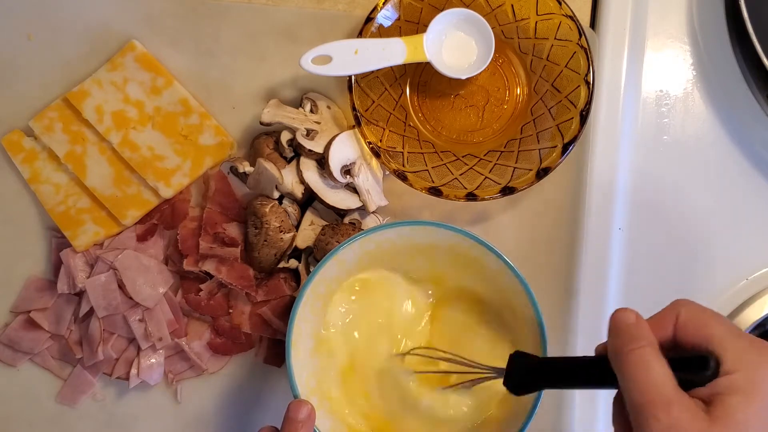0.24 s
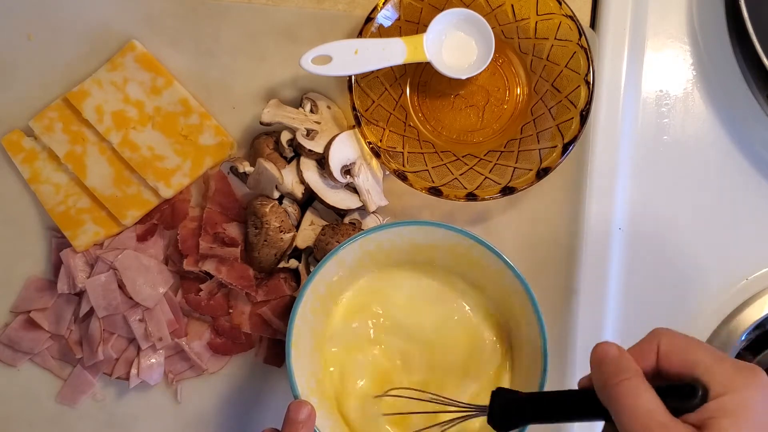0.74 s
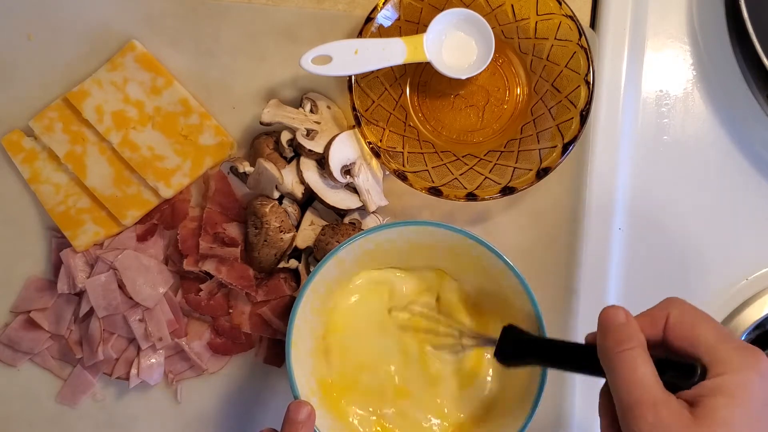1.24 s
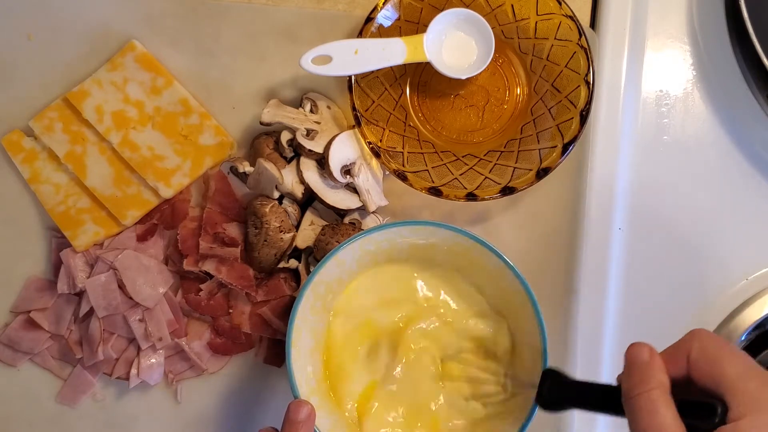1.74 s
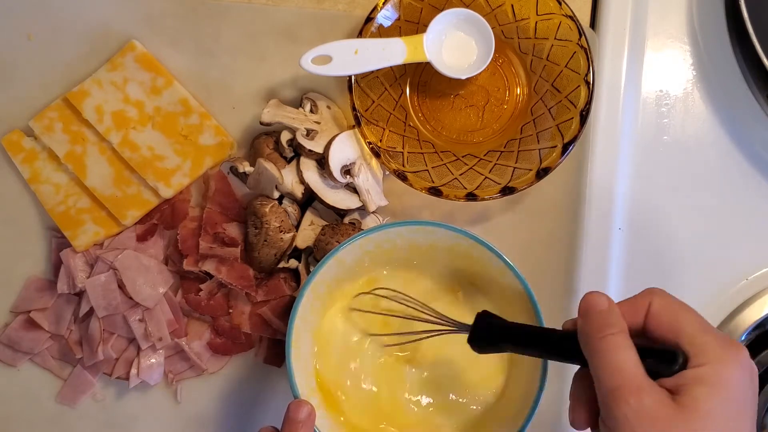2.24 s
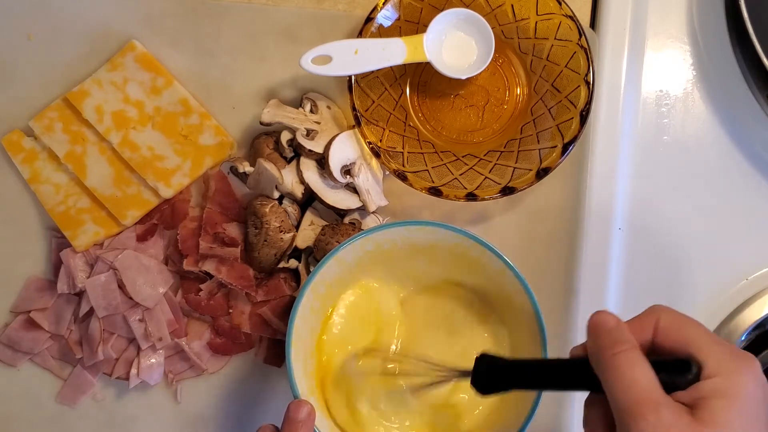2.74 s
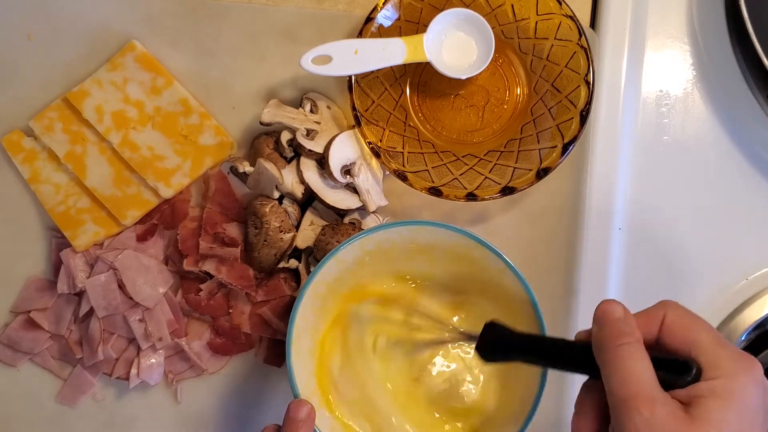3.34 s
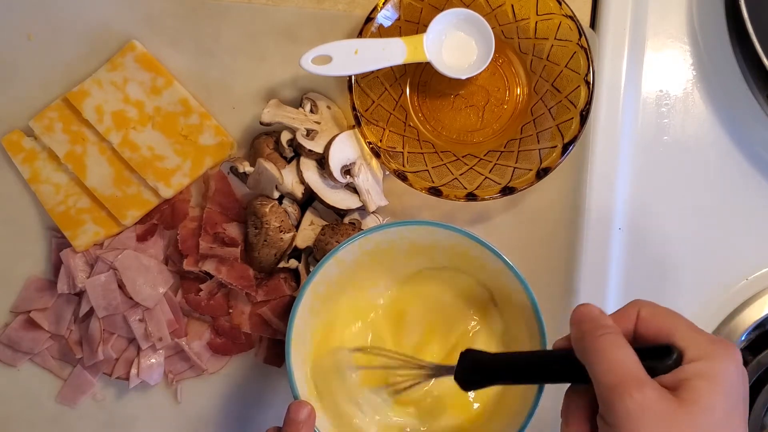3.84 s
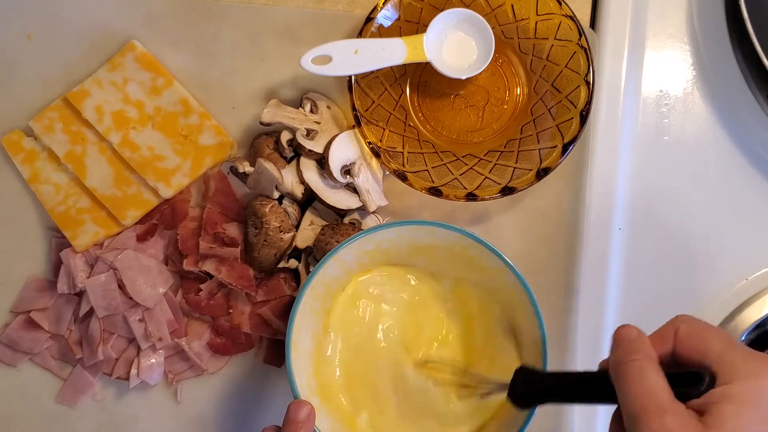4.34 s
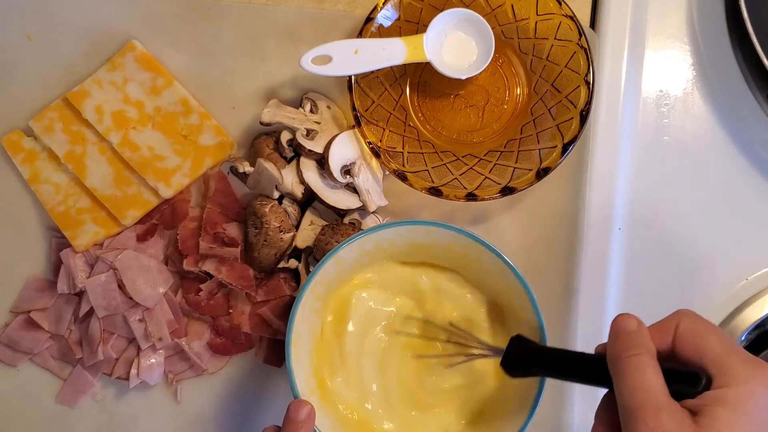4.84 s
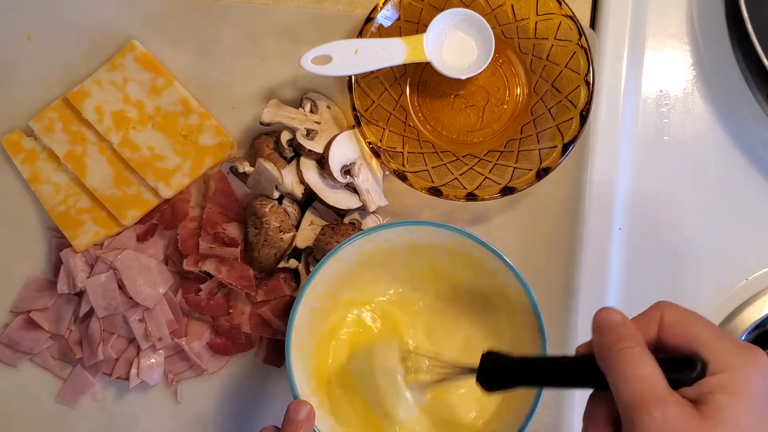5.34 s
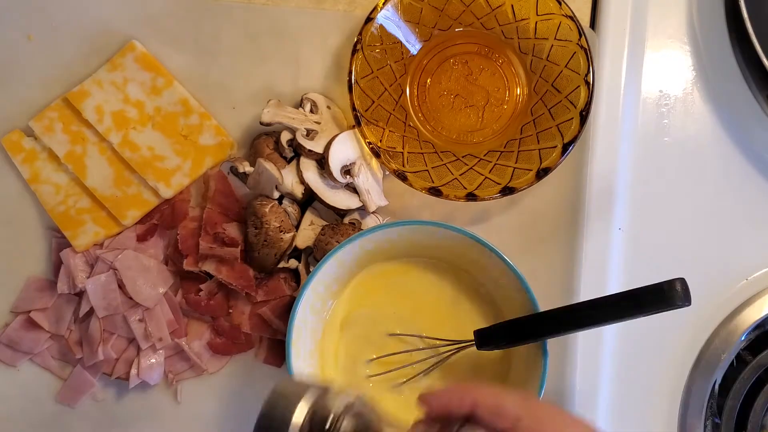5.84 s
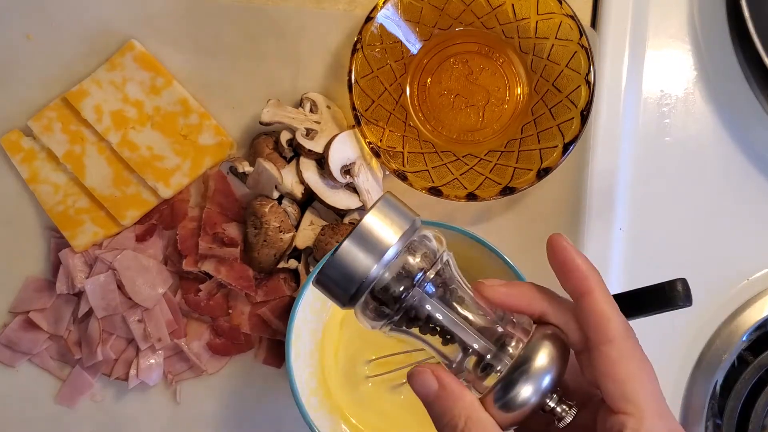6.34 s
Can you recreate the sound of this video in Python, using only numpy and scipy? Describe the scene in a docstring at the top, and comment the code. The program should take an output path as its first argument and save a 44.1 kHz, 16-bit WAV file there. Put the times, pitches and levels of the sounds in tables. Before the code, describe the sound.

Rapid, uneven whisk clinks and wet plops in a ceramic bowl over a low appliance hum, ending with a short dry shake of peppercorns.

```python
"""A wire whisk beats eggs and cream in a ceramic bowl, about five strokes a second. Noisy wire contacts excite
the wires and the bowl; breaking films tick, air pockets ring in the egg, and hard strokes knock the bowl and
shake the counter as damped tones and thuds. Then peppercorns rattle in a mill shaken over the bowl, as random
hits through the mill's resonances. A small kitchen adds an echo and a short tail; sine tones make a low
appliance hum and coloured noise the rush of the room."""
import sys
import numpy as np
from scipy import signal
from scipy.fft import rfft, irfft, next_fast_len
from scipy.io import wavfile
from scipy.ndimage import uniform_filter1d, map_coordinates

SR = 44100
rng = np.random.default_rng(int(sys.argv[2]) if len(sys.argv) > 2 else 0)


def log_audio(samples):
    """Write samples as a 16-bit WAV file to the path given in sys.argv[1]."""
    # one column per channel
    frames = np.atleast_2d(samples).T
    # limit to full scale, then quantise
    limited = np.clip(frames, -1, 1)
    pcm = np.round(limited * 32767).astype(np.int16)
    wavfile.write(sys.argv[1], SR, pcm)


N = 291060  # length of the scene in samples
T = np.arange(SR // 2) / SR  # time since a contact (s)

# The wires strike the bowl once a turn, now and then twice.
# Each row: start in seconds, level in dB, tilt of the low modes in dB.
STROKE_ROWS = [(0.0429, -39.5, 5), (0.054, -45, -5), (0.221, -39, -1.5), (0.427, -42.5, 0.5),
               (0.597, -44.5, -3.5), (0.8003, -58, -7), (0.971, -56.5, 3), (1.0937, -31, -10.5),
               (1.3, -46.5, -1), (1.454, -41.5, -3.5), (1.6241, -43.5, -6.5), (1.659, -47.5, -0.5),
               (1.8195, -52.5, -5), (1.853, -41, -9.5), (2.0143, -39.5, -2.5), (2.1995, -40.5, -4.5),
               (2.336, -40, -5), (2.5036, -45, -0.5), (2.702, -51, -6), (2.9031, -48.5, -4),
               (3.2738, -51.5, -1), (3.3206, -45, 1), (3.5044, -42.5, -3.5), (3.6937, -38.5, -3),
               (3.878, -46, -3), (4.06, -47, -2), (4.1973, -53, 1), (4.3673, -43, 5.5), (4.5487, -43, 14),
               (4.7172, -46.5, -2), (4.8931, -40.5, 2), (5.09, -40.5, 2), (5.149, -50.5, 2),
               (5.289, -47, -4.5), (5.3313, -51.5, -9), (5.4657, -40, 1), (5.652, -40, -6.5)]
# Air pockets open in the egg. Each row: start in seconds, level in dB before the layer's trim, pitch in Hz.
POCKET_ROWS = [(0.0519, -30, 1606), (0.059, -32.5, 2130), (0.228, -36, 1323), (0.552, -47.5, 1260),
               (0.582, -51, 3140), (1.097, -37.5, 1830), (1.2787, -29, 1435), (2.3077, -32, 2980),
               (2.867, -43, 1365), (3.047, -47, 1650), (3.626, -49.5, 3680), (4.164, -34.5, 2040),
               (4.289, -41, 2810), (4.365, -40, 1690), (4.533, -36.5, 1230), (4.546, -40, 1310),
               (4.551, -39, 2250), (4.611, -36, 1323), (4.799, -42.5, 1460), (4.9225, -31.5, 1193)]
# Resonances of the ceramic bowl. Each row: centre in Hz, width in Hz, relative level in dB.
BOWL_MODES = [(1040, 24, -7.5), (1166, 49, 2), (1340, 530, -3.5), (2060, 75, -1.5), (2750, 45, 10.5),
              (2970, 183, -1), (3400, 60, -7.5), (4200, 240, -16.5), (4720, 56, 1.5), (6740, 89, -8.5),
              (9450, 113, -16.5), (12460, 230, -27.5)]


def amp(db):
    """Decibels to gain."""
    return 10 ** (np.asarray(db) / 20)


def unit(x):
    """Scale to rms 1."""
    return x / np.sqrt(np.mean(x ** 2) + 1e-20)


def crest(x):
    """Scale so that the loudest 2 ms have rms 1."""
    power = uniform_filter1d(x ** 2, size=88, mode="constant")
    return x / np.sqrt(power.max() + 1e-20)


def along(points, hz):
    """(Hz, value) points read on a log axis."""
    f, v = np.transpose(points)
    return np.interp(np.log(hz + 1), np.log(f), v)


def fade(t60):
    """Exponential decay, 60 dB down after t60 seconds."""
    return np.exp(-np.log(1000) * T / np.maximum(t60, 1e-4))


def onset(rise_s):
    """Soft attack: an exponential approach to 1 with this time constant."""
    return 1 - np.exp(-T / rise_s)


def wobble(rate):
    """A smooth random curve, rate knots a second."""
    knots = rng.standard_normal(int(N * rate / SR) + 4)
    return map_coordinates(knots, [np.arange(N) * rate / SR])


def filtered(x, response):
    """x times a response of frequency."""
    m = next_fast_len(len(x) + 4096)  # silence after x leaves room for ringing
    return irfft(rfft(x, m) * response(np.fft.rfftfreq(m, 1 / SR)), m)[:len(x)]


def noise(spectrum, count):
    """Noise of rms 1, coloured by (Hz, dB) points."""
    return unit(filtered(rng.standard_normal(count), lambda hz: amp(along(spectrum, hz))))


def ring(modes):
    """Sum of damped sines from (Hz, dB, t60 s) modes."""
    hz, db, t60 = np.transpose(modes)[:, :, None]
    return np.sum(amp(db) * fade(t60) * np.sin(2 * np.pi * hz * T), axis=0)


def burst(t60):
    """Dying white noise of energy 1."""
    x = rng.standard_normal(len(T)) * fade(t60) * onset(0.0012)
    return x / np.linalg.norm(x)


def add(track, s, sound):
    """Mix a sound into the track at time s."""
    part = track[max(round(s * SR), 0):][:len(sound)]
    part += sound[:len(part)]


def body(peaks, hz, flip=-1):
    """Causal response of (Hz, width, dB) resonances; with flip=1 deep notches lie between them."""
    total = 0
    for k, (centre, width, db) in enumerate(peaks):
        damping = 1j * hz * width
        total = total + flip ** k * amp(db) * damping / (centre * centre - hz * hz + damping)
    return total


def contacts():
    """Each stroke lands a leading and a lighter trailing loop: rows (s, dB, low modes dB, drag t60 s)."""
    # How long the wires drag over the glaze. Each row: time in seconds, drag t60 in seconds.
    drag_times = [(0.4, 0.058), (0.8, 0.23), (1.1, 0.018), (1.45, 0.14), (2.2, 0.077), (2.34, 0.035),
                  (2.5, 0.16), (3.4, 0.05), (4.5, 0.041), (5.45, 0.15), (5.65, 0.033)]
    trail_s, scatter_s, trail_db = .045, .012, -18  # mean delay, its scatter, relative level
    rows = []
    for (s, db, low_db), late in zip(STROKE_ROWS, rng.standard_normal(len(STROKE_ROWS))):
        t60 = np.interp(s, *np.transpose(drag_times))
        rows.append((s, db, low_db, t60))
        rows.append((s + trail_s + scatter_s * late, db + trail_db, low_db, t60))
    return rows


def clashes(graze_db=-20, chatter_t60=0.014, drag_db=-6, ring_t60=0.31, ring_db=-21, scrape_db=-20, bowl_db=-5):
    """One wire grazes first, then the loops chatter and drag over the glaze, and the bowl rings with them."""
    # Resonances of the wire loops. Each row: mean centre in Hz, width in Hz, mean relative level in dB.
    wire_modes = [(1180, 70, 3), (2100, 150, -14), (2720, 70, 0), (3240, 70, -1), (3780, 120, 0),
                  (4200, 150, -3), (4550, 150, -1), (4900, 150, -4), (5550, 200, -4), (6150, 300, -3),
                  (7150, 300, -3), (8480, 250, 0), (9200, 400, -4), (10850, 300, -1), (11880, 300, 1),
                  (12400, 300, -1), (13750, 300, -1), (14400, 250, 1)]
    top_db = 4.5  # the wires' highest modes against their middle ones
    hard_db, dull_per_db = -42, 1  # treble lost (dB) per dB of level above hard_db
    graze_s = .003
    out = np.zeros(N)
    for s, db, low_db, t60 in contacts():
        pressure = fade(chatter_t60) + amp(drag_db) * fade(t60) + amp(ring_db) * fade(ring_t60)
        pressure = pressure * onset(0.00037)
        pressure = np.interp(T - graze_s, T, pressure, left=amp(graze_db))
        # the wires stick and slip, so the pressure comes in small clumps
        clumps = map_coordinates(rng.standard_normal(size=300), [T * 500], order=1)
        force = rng.standard_normal(len(T)) * amp(3.5 * clumps) * pressure
        # each contact bends the loops differently, detunes them and favours other modes
        modes = []
        for hz, width, level in wire_modes:
            detune = 1 + .02 * rng.standard_normal()
            modes.append((hz * detune, width, level + 3 * rng.standard_normal()))
        # harder strokes press the wires to the wall and lose treble
        treble_db = top_db - dull_per_db * max(db - hard_db, 0)

        def response(hz):
            wires = body(modes, hz, flip=0.94)
            bowl = amp(bowl_db) * body(BOWL_MODES, hz, flip=0.63)
            scrape = amp(scrape_db) / (1 + (900 / (hz + 1)) ** 4)
            tone = amp(np.interp(hz, [2700, 4000, 6000, 11500], [low_db, 0, 0, treble_db]))
            return (wires + bowl + scrape) * tone

        add(out, s - graze_s, amp(db) * crest(filtered(force, response)))
    return out


def snaps(walls_db=-3, spray_db=-8, spray_t60=0.079, trim_db=1):
    """A film of egg breaks with one sharp tick; the bowl's walls throw it back and droplets spray."""
    # Wet films snap off the wires. Each row: start in seconds, level in dB before the trim.
    film_rows = [(0.1845, -42.5), (1.0966, -27.5), (2.3047, -49), (3.4213, -49.5), (3.9794, -46.5),
                 (4.13, -49), (4.1638, -25.5), (4.354, -48.5), (4.5496, -44.5), (4.782, -54)]
    # Colour of a breaking film. Each row: frequency in Hz, relative level in dB.
    film_colour = [(700, -43), (1500, 4), (3500, 1.5), (6000, 1.5), (9000, 12), (14500, 12)]
    pocket_db = -10.5  # the snap of a pocket's film against the pocket's tabled level
    out = np.zeros(N)
    for s, db in list(film_rows) + [(s, db + pocket_db) for s, db, _ in POCKET_ROWS]:
        tick = signal.unit_impulse(len(T), idx=8)
        tick = tick + amp(walls_db) * burst(t60=0.013) + amp(spray_db) * burst(spray_t60)
        tick = filtered(tick, lambda hz: amp(along(film_colour, hz)))
        add(out, s, amp(db + trim_db) * crest(tick))
    return out


def pops(rise=0.017, splash_db=-10, trim_db=-2):
    """Each air pocket rings for a few cycles, its pitch rising as it opens."""
    # How long a pocket rings at its pitch. Each row: pitch in Hz, t60 in seconds.
    ring_times = [(1300, .028), (1450, 0.018), (2200, 0.021), (3000, 0.029)]
    splash_colour = [(600, -60), (1100, -3.5), (2200, 0.5), (3500, -2.5), (5000, -11.0), (12000, -39.0)]  # (Hz, dB)
    out = np.zeros(N)
    for s, db, hz in POCKET_ROWS:
        t60 = along(ring_times, hz)
        pitch = hz * (1 + rise * (1 / 2 - fade(t60)))
        cavity = np.sin(2 * np.pi * np.cumsum(pitch) / SR) * fade(t60) * onset(0.00065)
        splash = noise(splash_colour, len(T)) * fade(0.02)
        add(out, s, amp(db + trim_db) * crest(cavity + amp(splash_db) * splash))
    return out


def skips(count):
    """Each knock, then light bounces as the head skips along the wall: rows (s, dB)."""
    # The whisk's head knocks the bowl's wall. Each row: start in seconds, level in dB before the layer's trim.
    knock_rows = [(0.229, -48), (3.0565, -26), (4.535, -44)]
    spacing_s, bounce_db = .042, -25.5
    return [(s + k * spacing_s, db + bounce_db * (k > 0)) for s, db in knock_rows for k in range(count)]


def knocks(blow_t60=0.016, drag_db=-14, drag_t60=0.3, grind_db=-9, clack_db=-1, trim_db=-1):
    """The whisk hits the wall and grinds along it; the egg and the hand damp the bowl's ring."""
    grind_colour = [(500, -23.5), (1100, 11), (3000, 0), (6500, -9.5), (12000, -34)]  # (Hz, dB)
    clack = crest(ring([(1525, 0, .028)]))  # short, hollow note (Hz, dB, t60 s)
    out = np.zeros(N)
    for s, db in skips(count=3):
        pressure = fade(blow_t60) + amp(drag_db) * fade(drag_t60)
        force = rng.standard_normal(len(T)) * pressure
        clang = crest(filtered(force, lambda hz: body(BOWL_MODES, hz)))
        grind = crest(noise(grind_colour, len(T)) * pressure)
        add(out, s, amp(db + trim_db) * (clang + amp(grind_db) * grind + amp(clack_db) * clack))
    return out


def thumps(thud_db=-8.0, nudge_db=-11, trim_db=-1):
    """The counter booms under the bowl with a dull thud; every stroke nudges it a little too."""
    # Strokes push the bowl against the counter. Each row: start in seconds, level in dB before the trim.
    push_rows = [(0.06, -37), (0.226, -39.5), (0.453, -35.5), (1.098, -40), (1.283, -44), (2.204, -34.5),
                 (2.259, -40.5), (3.058, -27.5), (3.097, -32.5), (3.696, -39), (4.366, -45.5), (4.54, -32),
                 (5.469, -43.5)]
    # The counter under the bowl. Each row: mode in Hz, relative level in dB, t60 in seconds.
    counter_modes = [(78.1, 4, 0.39), (89, -16, 0.059), (150.5, -13.5, 0.21), (232.4, -9, 0.13),
                     (366, -19, 0.12)]
    thud_colour = [(40, -23), (90, 10), (350, 3.0), (600, -15.5), (1500, -50.0)]  # (Hz, dB)
    boom = ring(counter_modes)
    out = np.zeros(N)
    for s, db in list(push_rows) + [(s, db + nudge_db) for s, db, _ in STROKE_ROWS]:
        thud = noise(thud_colour, len(T)) * fade(0.2)
        add(out, s, amp(db + trim_db) * (boom + amp(thud_db) * thud) * onset(0.0028))
    return out


def squelch(wash_db=-85, bubbles_db=-82):
    """The egg washes softly round the wires and tiny bubbles burst for as long as it is stirred."""
    stirring = np.interp(np.arange(N) / SR, [5.7, 5.85], [1, 0])
    wash_colour = [(700, -20), (1300, 0), (3800, 0), (6000, -10), (14000, -15)]  # (Hz, dB)
    wash = noise(wash_colour, N) * amp(2.5 * wobble(14))
    bubbles, t = np.zeros(N), T[:SR // 20]
    for when, pitch, size in rng.random((600, 3)):
        hz = 1200 * 3.5 ** pitch
        swell = t * hz * np.exp(-t * hz / 3)  # loudest after three cycles
        add(bubbles, when * N / SR, size ** 3 * np.sin(2 * np.pi * hz * t) * swell)
    return (amp(wash_db) * wash + amp(bubbles_db) * unit(bubbles)) * stirring


def shaking():
    """Level of the tumbling in dB: each shake rises fast, sags while it lasts and dies away."""
    # The peppercorns are thrown, then slide back. Each row: start in seconds, level in dB, length in seconds.
    shake_rows = [(6.108, -46.5, 0.17), (6.396, -63.5, 0.011)]
    rise, sag, fall = 646.5, 43.5, 261  # dB per second
    t = np.arange(N) / SR
    levels = []
    for s, db, length in shake_rows:
        before, during = np.maximum(s - t, 0), np.clip(t - s, 0, length)
        after = np.maximum(t - s - length, 0)
        levels.append(db - rise * before - sag * during - fall * after)
    return np.max(levels, axis=0)


def pepper(density=1500, size_db=1.5, clump_db=1.5):
    """Peppercorns tumble in clumps (density in hits a second) against each other and the wall of the mill."""
    # Single corns hit the mill. Each row: start in seconds, level in dB.
    corn_rows = [(6.0918, -46.5), (6.227, -43.5), (6.391, -60)]
    # The mill's body. Each row: centre in Hz, width in Hz, relative level in dB.
    mill_modes = [(1647, 83, -13.5), (2800, 200, -26), (4290, 150, 1.5), (5250, 470, 1.5),
                  (6800, 760, -4.5), (8830, 940, -2.5), (11380, 720, 4.5), (11870, 200, 5.5),
                  (14070, 650, -11)]
    hits = (rng.random(N) < density / SR) * rng.standard_normal(N)
    hits = hits * amp(size_db * rng.standard_normal(N))
    tumble = unit(filtered(hits, lambda hz: body(mill_modes, hz, flip=0.93)))
    out = amp(shaking() + clump_db * wobble(120)) * tumble
    for s, db in corn_rows:
        blow = rng.standard_normal(len(T)) * fade(0.032)
        add(out, s, amp(db) * crest(filtered(blow, lambda hz: body(mill_modes, hz))))
    return out


def kitchen(x, echo_s=0.009, echo_db=-9, tail_db=-9):
    """A near surface returns one clear echo over a path some 3 m longer, and the room rings."""
    # Decay of the room. Each row: frequency in Hz, t60 in seconds.
    room_decay = [(100, 0.13), (1500, 0.3), (5000, 0.25), (14000, 0.19)]
    hz, t, z = signal.stft(rng.standard_normal(len(T)), SR, nperseg=256)
    decay = np.exp(-np.log(1000) * t / along(room_decay, hz)[:, None])
    tail = signal.istft(z * decay, SR)[1][:len(T)]
    tail *= onset(0.004)
    room = signal.fftconvolve(x, tail / np.linalg.norm(tail))[:N]
    # a delay, with the treble softened above 5 kHz
    echo = filtered(x, lambda hz: np.exp(-2j * np.pi * hz * echo_s) / (1 + (hz / 5000) ** 2))
    return x + amp(echo_db) * echo + amp(tail_db) * room


def background(air_db=-58):
    """An appliance motor hums, its overtones a little unsteady, over the soft rush of the room."""
    # The motor, then its overtones. Each row: mean pitch in Hz, rms level in dB before the wobble.
    hum_lines = [(53.2, -43.5), (265, -70), (353, -94), (425, -78.5), (640, -84.5)]
    # Colour of the room noise. Each row: frequency in Hz, relative level in dB.
    air_colour = [(25, -9.5), (60, 5), (110, 0.5), (270, -0.5), (420, -10), (600, -20.5), (900, -32.5),
                  (2000, -38), (5000, -40.5), (15000, -41.5)]
    # one shared time wobble makes all the pitches drift together
    t = np.arange(N) / SR + .025 * wobble(1.2) / hum_lines[0][0]
    motor, *overtones = [amp(db) * np.sqrt(2) * np.sin(2 * np.pi * hz * t) for hz, db in hum_lines]
    hum = motor * amp(.2 * wobble(6))
    for line in overtones:
        hum = hum + line * amp(2.5 * wobble(14))
    return hum + amp(air_db) * noise(air_colour, N)


def scene():
    """Whisk, egg, bowl and mill in the kitchen; the counter and the background carry no added echo."""
    close = clashes() + snaps() + pops() + knocks() + squelch() + pepper()
    return (kitchen(close) + thumps() + background())[None]


def record(dry):
    """The recorder cuts off steeply above its band limit."""
    top_hz = 14700
    return np.array([filtered(x, lambda hz: 1 / np.sqrt(1 + (hz / top_hz) ** 320)) for x in dry])


dry = scene()
out = record(dry)
log_audio(out)
```